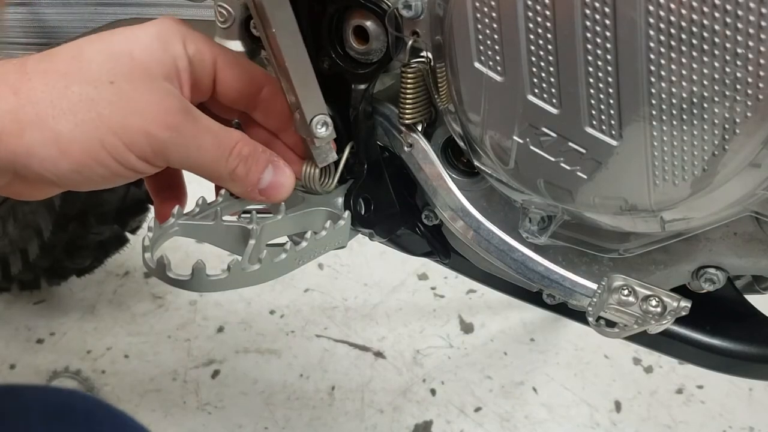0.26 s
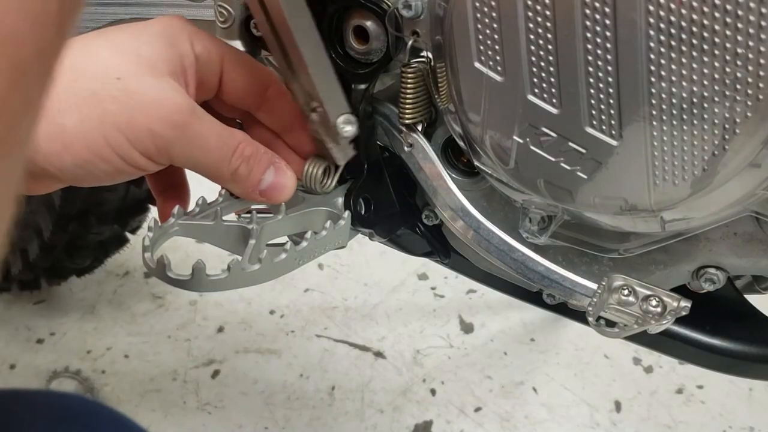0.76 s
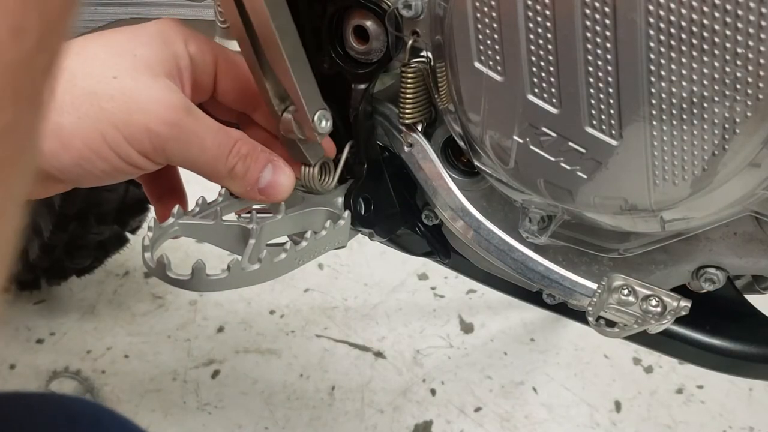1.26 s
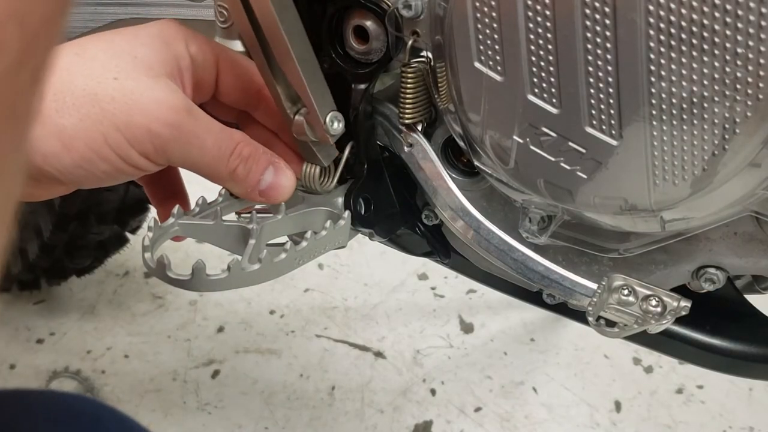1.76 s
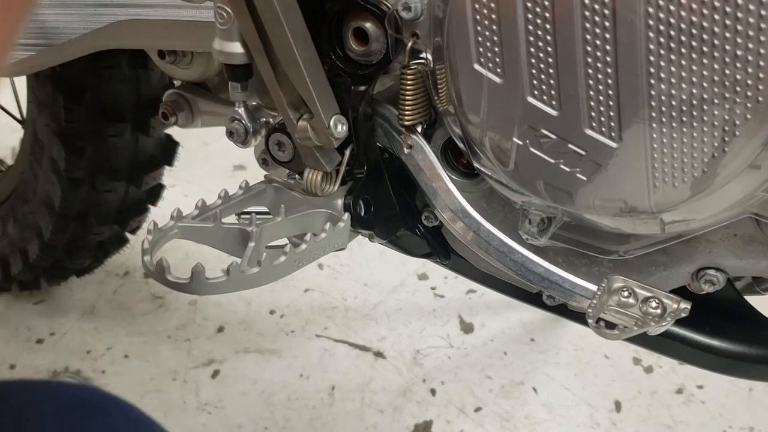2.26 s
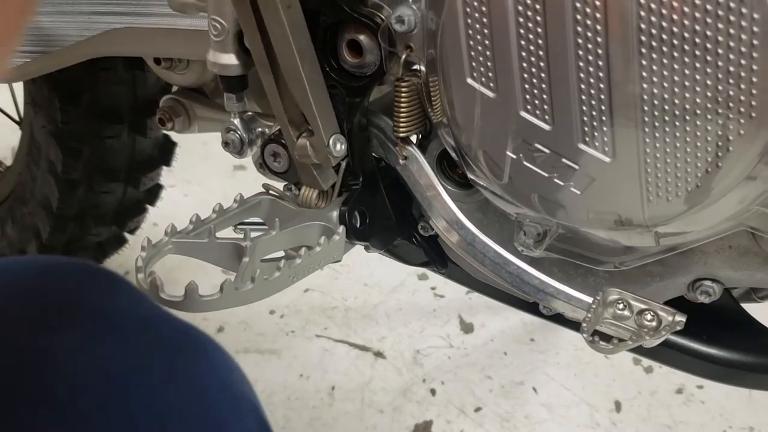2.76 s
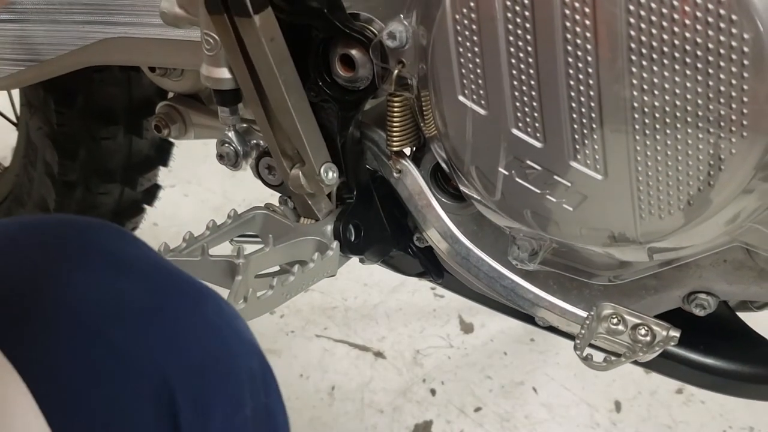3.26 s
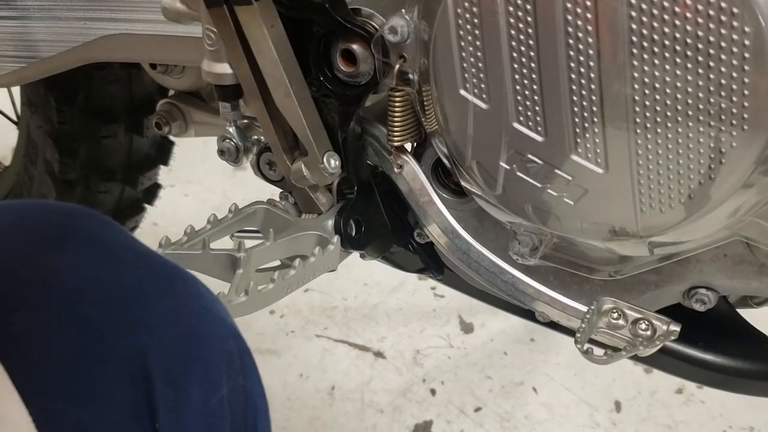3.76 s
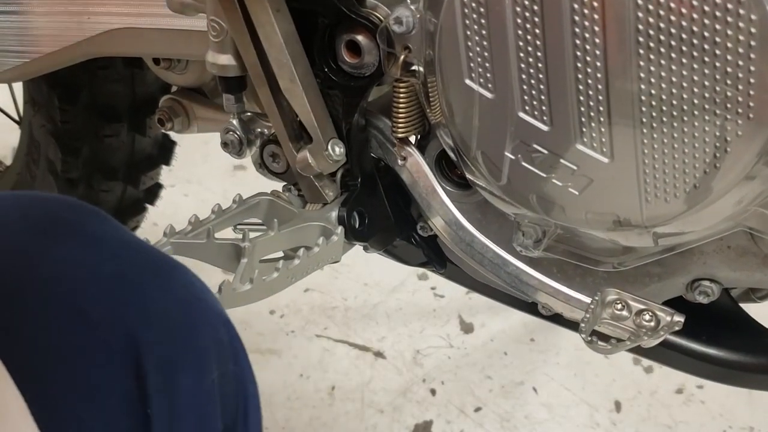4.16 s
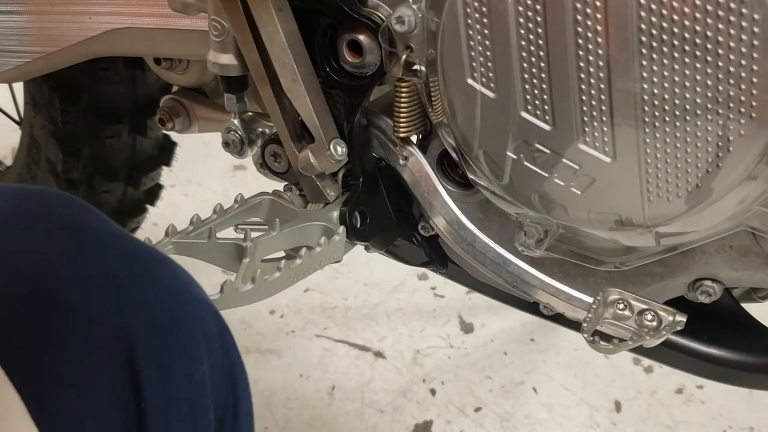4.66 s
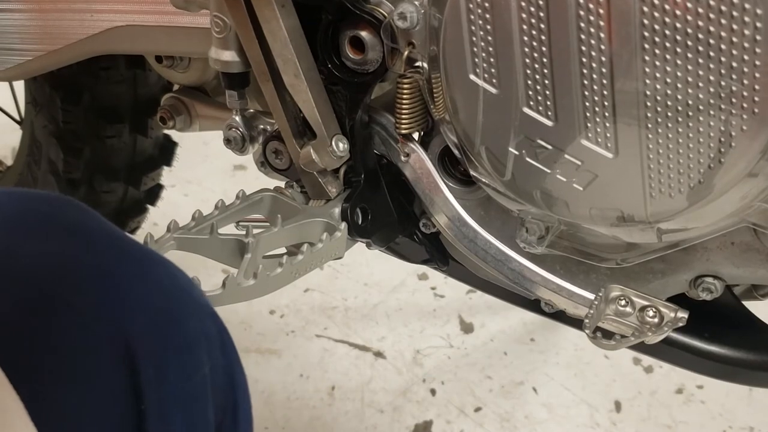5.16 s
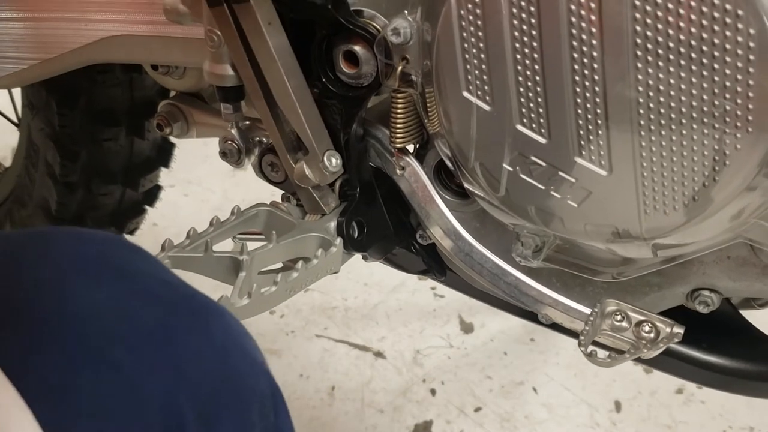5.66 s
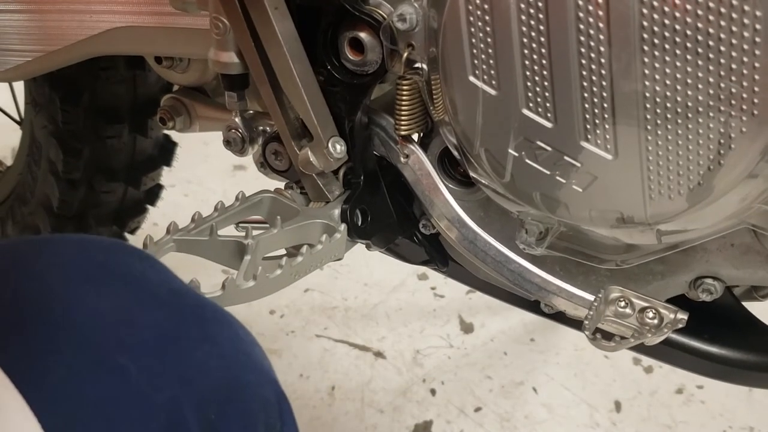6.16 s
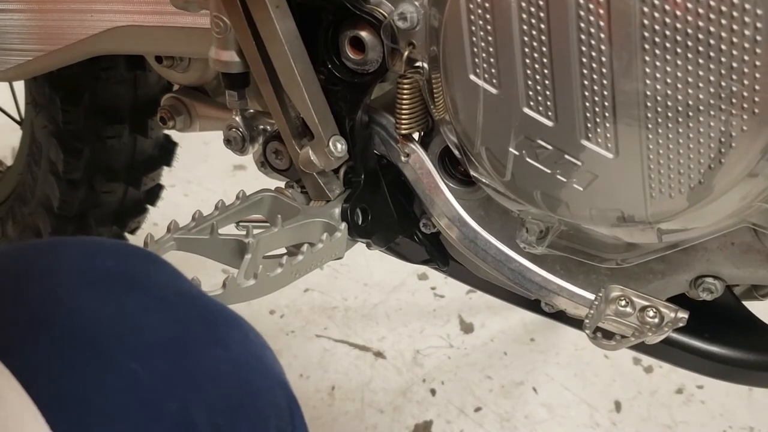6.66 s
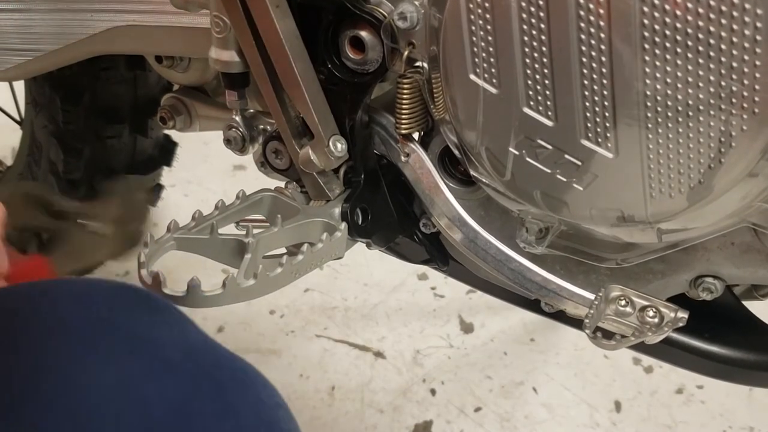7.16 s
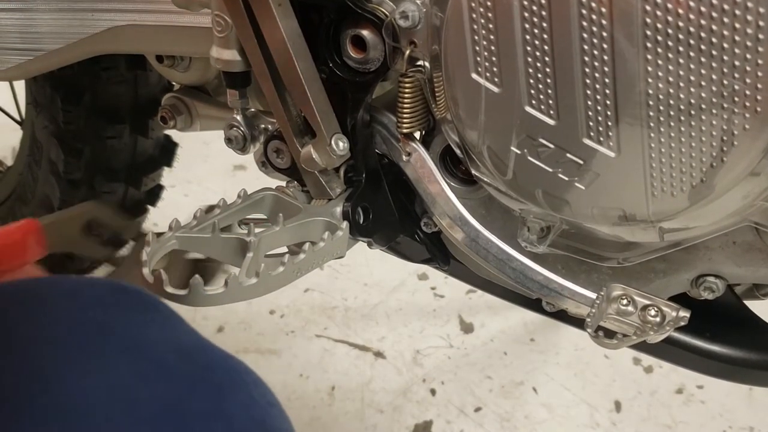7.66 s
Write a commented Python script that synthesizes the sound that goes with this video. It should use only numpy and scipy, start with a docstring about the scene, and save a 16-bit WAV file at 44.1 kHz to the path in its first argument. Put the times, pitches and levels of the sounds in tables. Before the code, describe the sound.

Faint metallic ticks from a spring open this close workshop scene, followed by shoes and knees shuffling on a concrete floor, tiny rubber squeaks and a few dull knocks on a footpeg. Hand tools clatter together with a bright, short ring. Near the end, pliers strike a pin in a motorcycle frame with two hard blows. A low hum, hiss and thin motor whine sit underneath in the slightly echoing room.

```python
"""A quiet workshop. First a spring ticks under pliers. From 2.5 s rubber soles squeak, shoes and knees drag on
the concrete and a peg is knocked. From 4.7 s hand tools are picked up: they clink and ring until gripped. At
7.1 s cloth and handling rumble low, then pliers hammer a pin in a motorcycle frame twice and the whole bike
thumps in answer. Throughout, hard walls echo over hum, hiss and a thin motor whine, which follow a drawn
recorder gain curve: up in the quiet, down after loud clinks and blows."""
import sys
import numpy as np
from scipy import signal
from scipy.fft import rfft, irfft, next_fast_len
from scipy.io import wavfile
from scipy.ndimage import uniform_filter1d

SR = 44100
rng = np.random.default_rng(int(sys.argv[2]) if len(sys.argv) > 2 else 0)


def materialize(psi):
    """Save the field psi as 16-bit PCM at rate SR to the path in sys.argv[1].

    A 1-D psi becomes a single channel; in a 2-D psi each row is a channel.
    """
    bounded = np.clip(np.atleast_2d(psi).T, -1, 1)
    quanta = np.round(bounded * 32767).astype(np.int16)
    wavfile.write(sys.argv[1], SR, quanta)


N = 348390
LN_60_DB = np.log(1000)

# Pliers on pin: (time [s], level [dB], left-right [dB], bass [dB], treble [dB])
HAMMER_HITS = [(7.2454, -11, 4, -6, 1), (7.2492, -7, 2, -1, 2), (7.2599, -24, 2, 4, -2),
               (7.2735, -13, 6, 2, -2), (7.5984, -11, 3, -7, -3), (7.6035, -15, 2, 0, -4),
               (7.618, -11, 10, -2, -2), (7.6236, -17, 3, 2, -5)]
# Contact spectrum: (frequency [Hz], density [dB])
HAMMER_SPECTRUM = [(180, -35), (300, -5.5), (425, -7), (900, -11.5), (1750, -5.5), (1930, -9.5), (2320, -3),
                   (2880, -10), (4750, -1.5), (8360, -6), (12700, -3), (16000, -6.5)]
# Frame modes: (frequency [Hz], level [dB], t60 [s])
FRAME_MODES = [(2100, -19, .25), (2550, -6, .04), (4400, -6, .05), (4950, -8, .08), (6100, -13, .25)]


def hammer():
    """Pliers strike the pin, several contacts a blow, and ring the frame."""
    return impacts(HAMMER_HITS, HAMMER_SPECTRUM, FRAME_MODES, usual_db=-12, t60_s=.028, rise_s=.0012,
                   push_s=.001, chatter=.45, body_db=-23, body_per_db=.3, low_db=-3)


# Bike's answer to each blow: (time [s], level [dB])
BIKE_THUMPS = [(7.256, -27), (7.607, -25)]
# Bike modes: (frequency [Hz], level [dB], t60 [s])
BIKE_MODES = [(191, 0, .11), (248, 0, .13)]


def bike_thumps():
    """Two low modes of the whole bike beat against each other."""
    out = np.zeros((2, N))
    for start_s, db in BIKE_THUMPS:
        add(out, undb(db) * ring(BIKE_MODES, SR // 2)[None], start_s, pan_db=0)
    return out


# Tool on tool: (time [s], level [dB], left-right [dB], bass [dB], treble [dB])
CLINK_HITS = [(4.6877, -27, -1, -19, -1), (4.7544, -22, -1, -5, -2), (4.779, -21, -1, -6, -3),
              (4.8694, -34, -5, -4, -5), (4.9626, -34, 2, -26, -9), (5.232, -25, -8, 2, -12),
              (5.27, -31, -8, 4, -12), (5.3184, -25, -5, 4, -7), (5.3374, -24, -4, -3, -9),
              (5.3984, -19, -9, -3, -3), (5.4091, -11, -6, -8, 2), (5.4174, -12, -6, -6, -3),
              (5.4284, -26, -12, 0, -7), (5.4495, -21, -15, -4, -6), (5.4634, -24, -15, -4, -5),
              (5.4949, -21, -7, 0, -1), (5.5194, -28, -4, 0, -1), (6.1399, -52, 4, 4, -16),
              (6.1766, -41, 4, 2, -10), (6.1943, -42, 4, 2, -14), (6.2253, -56, 3, 4, -10),
              (6.2608, -50, 3, 3, -6), (6.3574, -45, 2, 2, -5), (6.3677, -39, 3, 2, 0),
              (6.385, -41, 3, 2, -4), (6.4499, -55, 4, 2, -10)]
# Contact spectrum: (frequency [Hz], density [dB])
CLINK_SPECTRUM = [(120, -60.5), (200, -23.5), (1420, -19.5), (1740, -21), (2420, -13), (3070, -16.5),
                  (4600, -5.5), (6050, -8), (7270, -5), (8900, -16), (16000, -16.5)]
# Hand-damped tool modes: (frequency [Hz], level [dB], t60 [s])
HELD_TOOL_MODES = [(926, -14, .12), (2200, -5, .14), (2455, -7, .14), (3564, -9, .07), (4545, -3, .1),
                   (4630, 0, .08), (4740, -1, .08), (4860, -4, .07), (5480, -4, .08), (6570, -4, .08),
                   (6690, -3, .09), (6850, -5, .08), (7212, -2, .06), (7310, -3, .06), (7490, -4, .06),
                   (8270, -7, .07), (9350, -10, .06), (10600, -12, .08), (11900, -13, .06),
                   (13100, -15, .06)]


def tool_clinks():
    """Held steel tools chatter together and ring briefly."""
    return impacts(CLINK_HITS, CLINK_SPECTRUM, HELD_TOOL_MODES, usual_db=-25, t60_s=.075, rise_s=.0035,
                   push_s=.002, chatter=.9, body_db=-10, body_per_db=.38, low_db=-9)


# Undamped tools: (time [s], pliers [dB], spanner [dB], free for [s], left-right [dB])
TOOL_RINGS = [(4.962, -54, -39, 0.45, -1.5), (5.231, -21.5, -55, 0.14, 10.5), (5.408, -62, -43, 0.86, -7),
              (5.95, -70.5, -85.5, 0.16, -0.5)]
# Free modes: (frequency [Hz], level [dB], t60 [s])
PLIERS_MODES = [(2218, -22, .3), (3278, -20, 1.2), (3725, 0, .65), (4506, -14, 1.5), (5329, -5, .4),
                (6196, -17, .6), (7200, -28, .5), (8710, -19, .35), (11340, -30, .3), (11730, -25, .4)]
SPANNER_MODES = [(3176, 0, .26), (3295, -4, .5), (4511, -10, 1.2), (6352, -11, .6), (7407, -8, .36),
                 (8716, -15, .37), (9943, -17, .34), (10820, -19, .44), (12450, -23, .3), (13640, -24, .26)]


def tool_rings():
    """Pliers and spanner ring freely until a hand grips them."""
    out, t = np.zeros((2, N)), np.arange(SR // 2 + 6000) / SR
    pliers, spanner = ring(PLIERS_MODES, len(t)), ring(SPANNER_MODES, len(t))
    attack = 1 - np.exp(-t / .0041)
    for start_s, pliers_db, spanner_db, free_s, pan_db in TOOL_RINGS:
        grip = np.exp(-np.maximum(t - free_s, 0) / .006)
        steel = undb(pliers_db) * pliers + undb(spanner_db) * spanner
        add(out, attack * grip * steel[None], start_s, pan_db)
    return out


# Knocks on the peg: (time [s], level [dB], left-right [dB], bass [dB], treble [dB])
KNOCK_HITS = [(2.752, -40, 4, -6, 4), (2.769, -31, 3, -16, -7), (2.98, -32, 7, -6, -10),
              (3.007, -28, 3, 16, 0), (3.273, -14, 5, -3, -20), (3.311, -28, 4, -4, -20),
              (4.15, -36, 2, 0, -17)]
# Contact spectrum: (frequency [Hz], density [dB])
KNOCK_SPECTRUM = [(59, -30), (150, 0), (400, -5), (872, -1.5), (991, -13), (1130, -5.5), (1910, -15),
                  (4020, -14), (4470, -24), (5080, -16.5), (16000, -30.5)]
# Peg modes: (frequency [Hz], level [dB], t60 [s])
PEG_MODES = [(175, -2, .1), (240, -2, .1), (450, -5, .08), (690, -2, .1), (850, 0, .1), (1150, -3, .08),
             (3050, -16, .1), (4000, -14, .04)]


def peg_knocks():
    """Dull contacts excite the peg's low, short modes."""
    return impacts(KNOCK_HITS, KNOCK_SPECTRUM, PEG_MODES, usual_db=-30, t60_s=.027, rise_s=.002,
                   push_s=.00067, chatter=.32, body_db=-29, body_per_db=.1, low_db=0)


# Pliers on spring: (time [s], level [dB], left-right [dB], bass [dB], treble [dB])
TICK_HITS = [(0.1345, -57, -4, -11, -9), (0.8024, -48, -1, 4, -9), (0.814, -41, 7, -2, -12),
             (0.9112, -38, 2, -1, 7), (1.1903, -33, 0, -3, 2), (1.3382, -42, 3, -2, -2),
             (1.588, -41, 3, 3, -2), (1.697, -52, 10, -15, -10), (3.8831, -40, 2, 20, 24)]
# Contact spectrum: (frequency [Hz], density [dB])
TICK_SPECTRUM = [(180, -6), (300, -14), (1030, -31.5), (2360, -6.5), (2700, -14), (3640, -15.5),
                 (3950, -13.5), (11900, -32), (16000, -24)]
# Spring modes: (frequency [Hz], level [dB], t60 [s])
SPRING_MODES = [(1450, -6, .06), (1750, -6, .06), (2400, -2, .08), (3500, 0, .07), (4900, -8, .06),
                (6360, -6, .15), (8800, -12, .08)]


def spring_ticks():
    """Light chatter of the pliers rings the spring."""
    return impacts(TICK_HITS, TICK_SPECTRUM, SPRING_MODES, usual_db=-40, t60_s=.032, rise_s=.003,
                   push_s=.00033, chatter=1, body_db=-21, body_per_db=-.4, low_db=-5)


def impacts(hits, spectrum, modes, *, usual_db, t60_s, rise_s, push_s, chatter, body_db, body_per_db,
            low_db):
    """Noisy contact drives a body's modes; softer hits rise slower, last longer and favour low modes."""
    out, t = np.zeros((2, N)), np.arange(8192) / SR
    response = ring(modes, len(t)) * (1 - np.exp(-t / push_s))
    for start_s, db, pan_db, bass_db, treble_db in hits:
        softer_db = usual_db - db
        tilt = [(450, bass_db), (3000, 0), (11000, treble_db)]
        low_shelf = [(2500, low_db + .45 * softer_db), (4500, 0)]
        contact = np.exp(-LN_60_DB * t / (t60_s * np.exp(.018 * softer_db)))
        contact *= np.minimum(t / (rise_s * np.exp(.04 * softer_db)), 1)
        crack = contact * noise(len(t), lambda hz: undb(curve(spectrum, hz) + curve(tilt, hz)))
        rattle = contact * noise(len(t), lambda hz: undb(curve(tilt, hz) + curve(low_shelf, hz)))
        drive = chatter * rattle / np.sqrt(np.sum(contact ** 2))
        drive[:, 0] += 1 - chatter  # the rest is one clean impulse
        body = signal.fftconvolve(response[None], drive, axes=1)[:, :len(t)]
        body *= undb(body_db + body_per_db * softer_db)
        add(out, undb(db) * (.77 * crack + body), start_s, pan_db)
    return out


# Sole chirps: (time [s], length [s], from [Hz], to [Hz], partial 1 [dB], partial 2 [dB])
SOLE_SQUEAKS = [(2.554, 0.037, 1540, 1990, -55, -50.5), (2.714, 0.033, 742, 1267, -57, -62.5),
                (4.035, 0.06, 598, 1520, -49, -65), (4.262, 0.037, 816, 1159, -51.5, -46.5)]


def sole_squeaks():
    """Stick-slip of rubber speeds up and levels off."""
    out, waver = np.zeros((2, N)), walk(300)
    for start_s, length_s, from_hz, to_hz, *partials_db in SOLE_SQUEAKS:
        progress = np.linspace(0, 1, int(length_s * SR))
        hz = from_hz + (to_hz - from_hz) * np.sin(np.pi * progress / 2)
        hz *= 1 + .04 * waver[int(start_s * SR):][:len(hz)]
        phase = 2 * np.pi * np.cumsum(hz) / SR
        tone = sum(undb(db) * np.sin(k * phase) for k, db in enumerate(partials_db, 1))
        add(out, np.sqrt(np.sin(np.pi * progress)) * tone[None], start_s, pan_db=3)
    return out


# Drags: (full from [s], until [s], rise [s/20 dB], fall [s/20 dB], level [dB],
#         drag band [dB], scrape band [dB], rustle band [dB])
FLOOR_SCUFFS = [(2.55, 2.62, .14, .2, -58, -3, -2, -11), (2.77, 2.79, .06, .1, -53, -8, -6, -16),
                (3.87, 3.885, .06, .06, -74, -5, 7, 12), (4.068, 4.085, .025, .3, -53, -7, -10, -23),
                (4.27, 4.28, .07, .25, -53, -3, -8, -14), (4.33, 4.38, .15, .13, -60, -10, -5, -6),
                (6.77, 6.88, .25, .16, -60, -22, 0, -3)]
# Drag, body, scrape and rustle bands: (centre [Hz], width [Hz])
FRICTION_BANDS = [(850, 790), (2300, 1360), (4450, 2100), (11000, 27000)]


def floor_scuffs():
    """Soles and trousers drag on concrete; four noise bands catch and slip independently."""
    bands = [band_noise(N, hz, width_hz) * undb(1.7 * walk(35)) for hz, width_hz in FRICTION_BANDS]
    gains = np.zeros((len(bands), N))
    for *timing, db, drag_db, scrape_db, rustle_db in FLOOR_SCUFFS:
        gains += undb(db + swell_db(*timing)) * undb([[drag_db], [0], [scrape_db], [rustle_db]])
    return sum(gain * band for gain, band in zip(gains, bands))


def handling_rumble():
    """A short low rumble of cloth and handling ahead of the first blow."""
    db = -44 + swell_db(full_s=7.11, until_s=7.17, rise_s=.06, fall_s=.25) + 2 * walk(50)
    return undb(db) * band_noise(N, centre_hz=140, width_hz=167)


# Wall echo decay: (octave centre [Hz], t60 [s])
WALL_DECAY = [(125, 0.52), (250, 0.37), (500, 0.36), (1000, 0.46), (2000, 0.61), (4000, 0.49), (8000, 0.35),
              (16000, 0.24)]


def wall_echo(x):
    """Dense reflections, each octave fading at its own rate."""
    t = np.arange(SR) / SR
    tail = sum(band_noise(SR, hz, 1.62 * hz) * np.sqrt(hz) * np.exp(-LN_60_DB * t / t60_s)
               for hz, t60_s in WALL_DECAY)
    tail *= np.minimum(t / .004, 1)
    tail /= np.sqrt(np.sum(tail ** 2) / 2)
    return signal.fftconvolve(x.mean(axis=0)[None], tail, axes=1)[:, :N]


# Recorder gain on the background, as a drawn curve: (time [s], gain [dB])
RECORDER_GAIN = [(0.0, -65.5), (0.75, -61.5), (1.58, -60.5), (3.19, -58.5), (3.94, -59.5), (4.7, -57.5),
                 (5.45, -56.5), (5.72, -65), (6.18, -63.5), (7.04, -62), (7.41, -66), (7.9, -61.5)]
# Hums: (centre [Hz], width [Hz], relative level [dB])
HUM_BANDS = [(64.6, 15, 1), (86, 14, -1.5), (122.8, 11, -2.5), (240.4, 15, -9.5)]
# Air noise spectrum: (frequency [Hz], density [dB])
AIR_SPECTRUM = [(12, -50), (20, -25), (70, 1), (130, -15.5), (187, -13.5), (310, -19.5), (499, -31.5),
                (574, -36), (1570, -38), (2320, -39.5), (2530, -36.5), (3070, -39.5), (8650, -57),
                (12800, -44), (16000, -61)]


def background():
    """Hum, hiss and motor whine; drawn recorder gain creeps up in the quiet, ducks after loud hits."""
    gain_db = np.interp(np.arange(N) / SR, *np.transpose(RECORDER_GAIN))
    drift_db = gain_db - gain_db.mean()
    hums = sum(undb(db + 2.5 * walk(5.4)) * band_noise(N, hz, width_hz) for hz, width_hz, db in HUM_BANDS)
    air = undb(-58.5 + .81 * drift_db) * noise(N, lambda hz: undb(curve(AIR_SPECTRUM, hz)))
    whine_db = -72.5 + 2.8 * walk(14) + .22 * drift_db
    whine_hz = 2500 + 8 * walk(20)
    whine = undb(whine_db) * np.sin(2 * np.pi * np.cumsum(whine_hz) / SR)
    return undb(gain_db - 2) * hums + air + whine


def undb(db):
    """dB to gain."""
    return 10 ** (np.asarray(db) / 20)


def unit_rms(x):
    """Scale to rms 1."""
    return x / np.sqrt(np.mean(x ** 2))


def curve(points, hz):
    """Interpolate (frequency [Hz], value) points on a log axis."""
    points_hz, values = np.transpose(points)
    return np.interp(np.log(hz + 1), np.log(points_hz), values)


def noise(size, gain):
    """Stereo noise shaped by gain(hz), rms 1; long waves reach both channels nearly alike."""
    fft_size = next_fast_len(size, True)
    hz = np.fft.rfftfreq(fft_size, 1 / SR)
    coherence = .91 / (1 + (hz / 980) ** 4)
    phasors = np.exp(2j * np.pi * rng.random((2, len(hz))))
    mid, side = phasors * np.sqrt(rng.exponential(size=(2, len(hz))))
    stereo = np.sqrt(1 + coherence) * mid + np.sqrt(1 - coherence) * side * np.array([[1], [-1]])
    return unit_rms(irfft(gain(hz) * stereo, fft_size)[:, :size])


def band_noise(size, centre_hz, width_hz):
    """Stereo noise in a steep-sided band."""
    return noise(size, lambda hz: 1 / np.sqrt(1 + (2 * (hz - centre_hz) / width_hz) ** 4))


def walk(rate_hz):
    """Random steps smoothed twice, rms 1."""
    hold = int(SR / rate_hz)
    steps = np.repeat(rng.standard_normal(N // hold + 1), hold)
    return unit_rms(uniform_filter1d(uniform_filter1d(steps, hold), hold)[:N])


def ring(modes, size):
    """Decaying modes; neighbours start in opposite phase."""
    hz, db, t60_s = np.transpose(modes)[:, :, None]
    t = np.arange(size) / SR
    sign = (-1.) ** np.arange(len(hz))[:, None]
    return np.sum(sign * undb(db) * np.exp(-LN_60_DB * t / t60_s) * np.sin(2 * np.pi * hz * t), axis=0)


def swell_db(full_s, until_s, rise_s, fall_s):
    """Climb, hold at 0 dB, sink; 20 dB per rise or fall time."""
    t = np.arange(N) / SR
    return -20 * (np.maximum(full_s - t, 0) / rise_s + np.maximum(t - until_s, 0) / fall_s)


def add(out, x, start_s, pan_db):
    """Mix x in at start_s, leaning left by pan_db."""
    i = int(start_s * SR)
    out[:, i:i + x.shape[1]] += (x * undb([[pan_db / 2], [-pan_db / 2]]))[:, :N - i]


def scene():
    """Hits, squeaks and rings with their echo, over dry rubbing and the workshop air."""
    near = spring_ticks() + peg_knocks() + tool_clinks() + hammer() + sole_squeaks()
    rings = tool_rings() + bike_thumps()
    echo = undb(-2) * wall_echo(near + .62 * rings)
    return near + rings + echo + floor_scuffs() + handling_rumble() + undb([[.6], [-.6]]) * background()


# Microphone port imbalance: (frequency [Hz], left-right [dB])
PORT_BALANCE = [(60, 0.5), (110, 1.0), (200, 2.5), (380, 3.5), (700, 3.5), (1290, 4.5), (2380, 4.5),
                (4400, 5.5), (8120, -1.5), (15000, -0.5)]


def record(dry):
    """The two ports differ in colour and sound reaches the right one late; the top is cut."""
    right_lag_s, top_hz = 2e-4, 16100
    hz = np.fft.rfftfreq(N, 1 / SR)
    balance_db = curve(PORT_BALANCE, hz)
    colour = undb([balance_db / 2, -balance_db / 2])
    delay = np.exp(-2j * np.pi * hz * np.array([[0], [right_lag_s]]))
    lowpass = signal.ellip(10, .2, 70, top_hz, fs=SR, output="sos")
    return signal.sosfilt(lowpass, irfft(rfft(dry) * colour * delay, N))


dry = scene()
out = record(dry)
materialize(out)
```